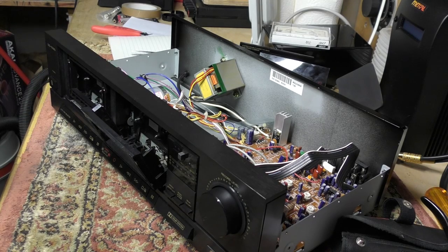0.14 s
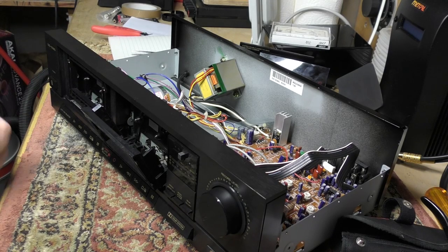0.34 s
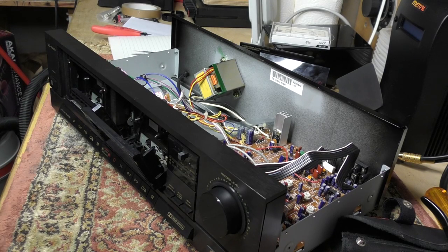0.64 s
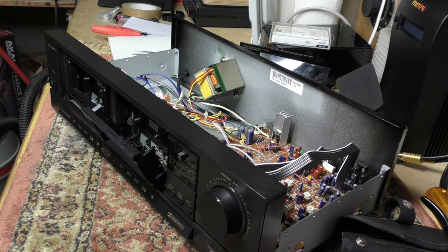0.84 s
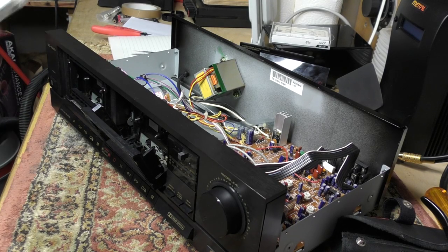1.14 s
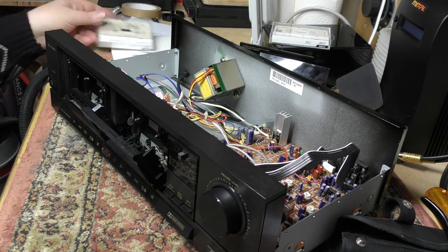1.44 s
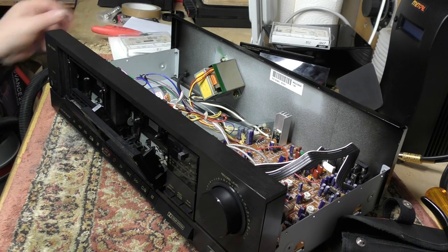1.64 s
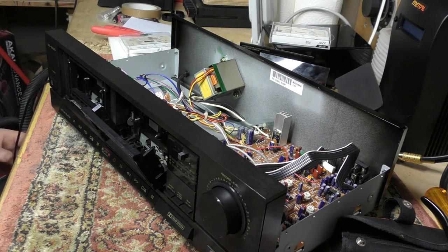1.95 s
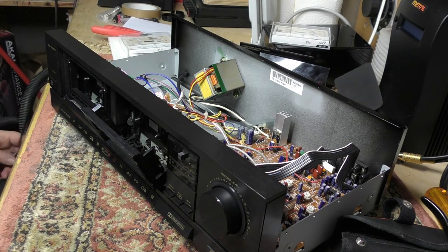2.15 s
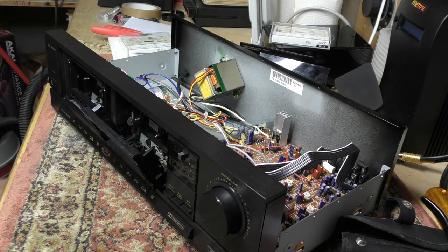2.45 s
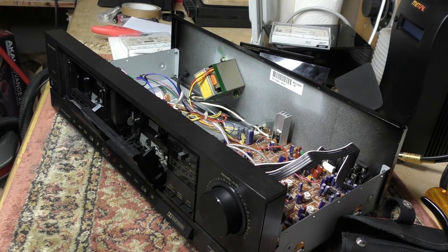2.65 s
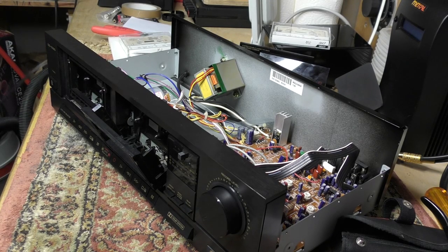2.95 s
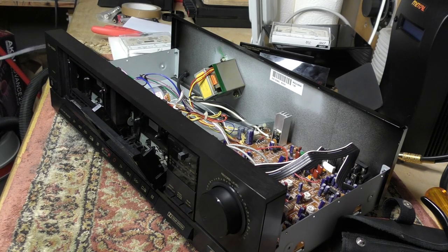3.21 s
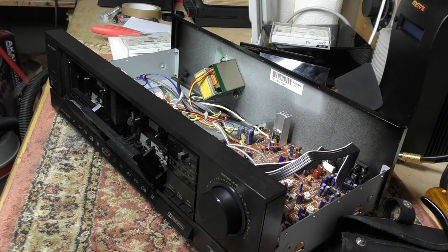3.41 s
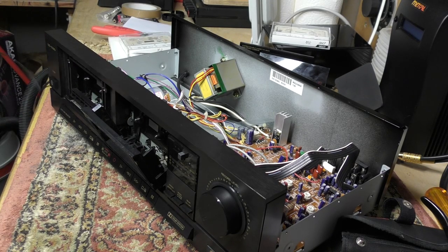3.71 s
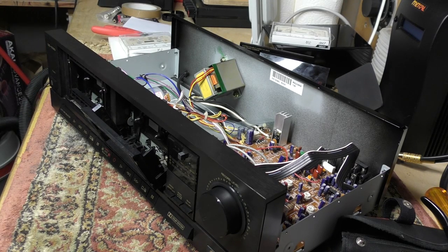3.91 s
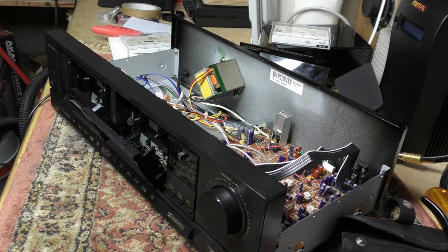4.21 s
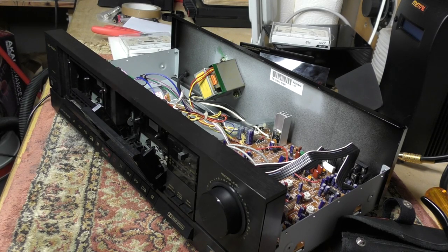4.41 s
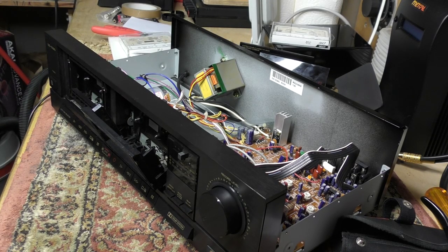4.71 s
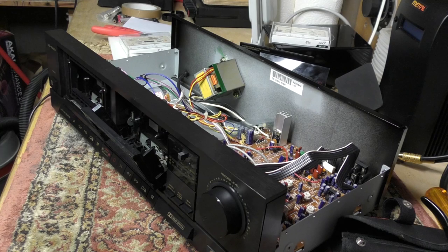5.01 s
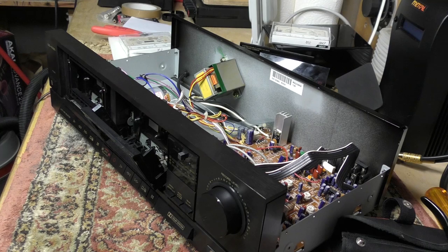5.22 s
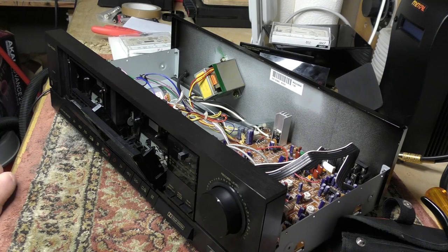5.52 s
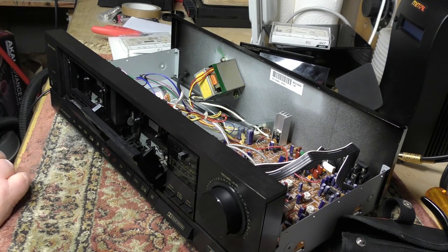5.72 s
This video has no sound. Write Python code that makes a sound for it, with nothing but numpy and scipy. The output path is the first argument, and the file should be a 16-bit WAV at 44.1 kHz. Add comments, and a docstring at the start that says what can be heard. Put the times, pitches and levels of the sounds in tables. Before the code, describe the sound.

Hard plastic clicks and cassette rattles end in a loud clack, then a key mechanism clunks, slides and latches in a small room.

```python
"""Hands at a cassette deck

Hands work hard plastic parts beside an open cassette deck in a small, cluttered room, off-centre to two ports.
Catches snap, a cassette rattles in its case and is put down with a clack; later a key mechanism clunks,
slides and clicks. Contacts are bursts of noise in narrow bands; the room scatters them 3.9 ms behind, and
resonant plastic shells ring to both. Sleeve, pushed air, rumble, hiss and mains hum are shaped noise and a sine."""
import sys
import numpy as np
from scipy import signal
from scipy.fft import rfft, irfft, next_fast_len
from scipy.io import wavfile

SR = 44100
rng = np.random.default_rng(int(sys.argv[2]) if len(sys.argv) > 2 else 0)


def transcribe(u):
    """Save the signal u as a 16-bit wav file named by the first command-line argument.

    u: samples, shape (n,) or (channels, n), limited to [-1, 1]; the rate is SR.
    q: integer samples, one column per channel.
    """
    v = np.clip(np.atleast_2d(u).T, -1, 1)
    q = np.round(v * 32767).astype(np.int16)
    wavfile.write(sys.argv[1], SR, q)


N = 258426
TIME = np.arange(N) / SR

# Steady tone of the room. Each row: frequency in Hz, relative level in dB.
ROOM_TONE = [(11, -54), (18, 6), (59, -7), (201, -16.5), (283, -17), (500, -22), (576, -21.5), (645, -21.5),
             (765, -26), (908, -25), (1110, -26.5), (1950, -30), (3550, -32.5), (16000, -45.5)]
ROOM_TONE_DB = -46
HUM_HZ, HUM_DB = 99.6, -64.5

# Likeness of left and right. Each row: frequency in Hz, correlation from -1 to 1.
FLOOR_LIKENESS = [(30, -.2), (100, 0.13), (400, 0.09), (2000, 0.3), (8000, 0.11)]
CLICK_LIKENESS = [(150, 0.95), (700, 0.43), (2000, 1), (6000, 0.57), (13000, 0.74)]

# Plastic sliding under the fingers. Each row: start in seconds, length in seconds, level in dB before the touch trim.
RUBS = [(0, 0.031, -41), (.28, 0.11, -44), (.58, 0.058, -46.5), (1.2, 0.28, -50.5), (1.55, 0.11, -40.5),
        (4.46, .03, -59)]
RUB_ATTACK_S, RUB_RELEASE_S = 0.059, 0.47
# Spectrum of the rubbing. Each row: frequency in Hz, relative level in dB.
RUB_COLOUR = [(200, -14.5), (500, -11.5), (1400, 1), (2700, -5), (4500, -2), (6500, -8.5), (10000, -14),
              (16000, -30)]

# Hard plastic snapping or striking; small, sharp parts sound bright, heavy ones dark.
# Each row: start in seconds, strength in dB, brightness in dB per octave, ring t60 in seconds at 3 kHz.
CLICKS = [ (.001, 2, -1.4, .06), (.05, -9, -8, 0.014), (0.1183, -9.5, 1.5, 0.046),
          (0.13, -0.5, -4.5, 0.044), (.263, -7, -5, 0.087), (.3093, 4.5, 2, 0.051),
          (0.3157, 9, -0.5, 0.097), (.342, -3.5, -1, 0.023), (0.373, 6.5, -4.5, 0.025),
          (.403, -4, -2, 0.031), (0.5243, -4, -4.5, 0.036), (0.5298, 5.5, 2.3, 0.054), (0.54, 1, -1, .065),
          (.579, -0.5, 0.8, .028), (0.6364, 2, 1, .058), (0.777, -8.5, 0.5, 0.076), (.783, 8, 4.5, 0.026),
          (0.8093, 9, -1, 0.069), (.824, 15, -3, 0.041), (0.946, -10.5, -3, .02),
          (1.0958, 12.5, -4.5, 0.12), (1.103, 13, -4, 0.046), (1.1054, 14, 1.5, 0.028),
          (1.244, 0, 0.5, 0.046), (1.3187, 0.5, -4.5, .055), (1.477, 3, -6, 0.11), (1.501, 20, -0.7, 0.072),
          (1.609, 7.5, -1, 0.039), (1.644, 18, -6, 0.061), (1.652, 5, 4, 0.055), (1.674, 5.5, -1.5, 0.11),
          (5.422, -26.5, 3.5, 0.1)]
# Soft, cushioned bumps of fingers and settling parts, in the same columns as the clicks.
BUMPS = [ (1.103, 15.5, 2, .045), (1.4841, 8, -0.5, 0.044), (1.503, 18.5, 0.5, 0.039),
         (1.852, -13.5, -5.5, 0.092), (1.979, .5, 3, 0.06), (2.197, 0, -3.5, .055), (2.28, -18, -6, 0.038),
         (2.678, -7.5, -2, 0.065), (3.672, 3.5, -2.5, 0.036), (3.72, -1, 2, 0.22), (4.142, -0.5, 0.7, 0.06),
         (4.191, -2.5, 6, 0.22), (4.208, -2.5, -.5, 0.11), (4.463, -3.5, 2.2, 0.15),
         (5.245, -11.5, 1.5, 0.125), (5.315, -10, 0.5, 0.21)]
# The key mechanism clunks in, then latches with a click; same columns again.
KEY_BLOWS = [(3.6568, 14, -5, 0.046), (4.011, -1, 1, 0.048), (4.0134, 7, 1.55, 0.044), (4.017, 2, 0, 0.047),
             (4.054, -5, -4.5, .05)]
# Spectra of the three kinds of contact. Each row: frequency in Hz, level in dB.
CLICK_COLOUR = [(220, -24), (500, -9.5), (1400, 1), (2400, -.5), (4400, -1), (10500, -16.5)]
BUMP_COLOUR = [(110, -10), (250, -1.5), (580, 3.5), (1300, -2), (2600, -7), (4400, -23.5), (10500, -43)]
KEY_COLOUR = [(220, -21), (550, -6.5), (900, -7), (1700, 4), (2600, -1), (3400, 2), (5500, -5.5),
              (10500, -15.5)]
# Timbre common to all contacts. Each row: frequency in Hz, level in dB.
PLASTIC = [(70, -16), (130, 3), (330, -1.5), (600, -1), (950, 2), (1400, 1), (2100, -1.5), (2700, -1),
           (3600, 0), (5500, 5), (7000, 2.5), (9500, 5.5), (12500, -0.5), (16000, -35)]
BRIGHTNESS_PIVOT_HZ = 1500

# The room's answer. Each row: frequency in Hz, level in dB against the direct sound, t60 in seconds.
ROOM = [(150, -7, 0.31), (490, -5, 0.3), (1440, -9, 0.29), (4740, -5.5, 0.23), (9000, -9, 0.22),
        (15000, -13, .14)]

# Modes of the cassette and its case. Each row: frequency in Hz, level in dB before the ring gain, t60 in seconds.
CASE_MODES = [(500, -9, .15), (600, -5, .15), (700, -7, .15), (790, -8, .12), (944, -9, .15),
              (1050, -7, .12), (1200, -6, .09), (1370, -4, .11), (1515, -7, .11), (1765, -7, .1),
              (2190, -7, .11), (2406, -7, .1), (3000, -8, .07), (3262, -4, .11), (3650, -8, .07),
              (3950, -7, .08), (4255, -6, .08), (4950, -6, .09), (5500, -3, .09), (5990, -9, .07)]
# Modes of the key mechanism and its chassis, in the same columns.
KEY_MODES = [(88, 3, .2), (195, -5, .15), (440, -3, .1), (662, -6, .1), (890, -9, .1), (1517, 4, .12),
             (1810, -3, .06), (2100, -5, .07), (3370, 1, .05), (4316, -6, .07), (5280, 0, .07),
             (5920, -5, .08), (8230, -3, .07), (9600, -3, .06)]
KEYS_FROM_S = 3.4

# Where the hands work. Each row: time in seconds, left minus right in dB.
PLACE = [(1.3, 0.5), (1.5, -2), (4, 0), (5.8, -6)]
# Lean between the microphone ports. Each row: frequency in Hz, left minus right in dB.
BALANCE = [(100, -3), (600, -6.5), (1400, -1), (4500, -1.5), (8000, -1), (12000, -5.5)]
# Phase by which the left port leads. Each row: frequency in Hz, lead in radians.
LEFT_LEAD = [(100, .1), (600, 0.32), (1500, 0.76), (3000, 0.85), (5500, 0.66), (8500, 1.33), (11000, 2.63),
             (16000, 4)]

# Air pushed by the passing arm. Each row: start in seconds, length in seconds, level in dB.
GUSTS = [(1.4, 0.045, -32.5), (1.68, 0.098, -35.5), (1.95, 0.35, -43.5)]
GUST_ATTACK_S, GUST_RELEASE_S = 0.064, 0.71
# Spectrum of the pushed air. Each row: frequency in Hz, relative level in dB.
DRAUGHT_COLOUR = [(15, -6), (27, 0), (32, 0), (42, -10), (70, -28), (200, -55), (1000, -90)]

# A sleeve brushes the bench as the arm draws back and reaches in again.
# Each row: start in seconds, length in seconds, level in dB, brightness in dB per octave.
BRUSHES = [(2.5, 0.12, -52.5, -1), (2.823, 0.35, -57, -1), (3.227, 0.093, -55, 8),
           (4.467, 0.27, -52.5, -0.5), (4.772, 0.27, -55.5, -1), (5.1, 0.31, -58.5, -2.5)]
BRUSH_ATTACK_S, BRUSH_RELEASE_S = 0.064, 0.45
# Spectrum of the cloth. Each row: frequency in Hz, relative level in dB.
SLEEVE_COLOUR = [(300, 5), (1200, 5), (3000, 2.5), (5500, 5), (7000, 0), (9000, -1.5), (12000, -9.5),
                 (16000, -15)]

# The mechanism's slider takes up its slack, then runs home.
# Each row: start in seconds, length in seconds, level in dB, first pitch in Hz, last pitch in Hz.
SLIDES = [(3.48, 0.19, -55.5, 4720, 4610), (3.749, 0.31, -50, 4270, 5860)]
SLIDE_ATTACK_S, SLIDE_RELEASE_S = 0.12, 0.7
# Spectrum of the slider's dry friction. Each row: frequency in Hz, relative level in dB.
TRAVEL_COLOUR = [(300, 1), (1100, 2), (2000, -6), (2900, -5.5), (3700, -1), (5700, -2.5), (6800, -14),
                 (10000, -22), (16000, -34)]
# Resonances of the squeak. Each row: multiple of its pitch, level in dB.
SQUEAK = [(.8, -14), (1, -11), (1.12, -13)]

# The clunk of the mechanism shakes the whole deck.
THUMP_AT_S, THUMP_HZ, THUMP_DB, THUMP_T60_S = 3.658, 115, -40, 0.29

CUTOFF_HZ = 16200


def from_db(db):
    """Decibels to gain."""
    return 10 ** (np.asarray(db) / 20)


def unit_energy(x):
    """Scale each row to energy 1."""
    return x / np.sqrt(np.sum(x ** 2, axis=-1, keepdims=True) + 1e-20)


def at_hz(points, hz, axis=1):
    """Read a column of a spectrum table on a log-frequency axis."""
    points = np.array(points)
    return np.interp(np.log(hz), np.log(points[:, 0]), points[:, axis])


def tilted(colour, brightness):
    """A spectrum made brighter by so many dB per octave about the pivot."""
    return [(hz, db + brightness * np.log2(hz / BRIGHTNESS_PIVOT_HZ)) for hz, db in colour]


def fft_grid(length):
    """A fast transform size and its frequencies, kept above zero for the log axis."""
    size = next_fast_len(length)
    return size, np.maximum(np.arange(size // 2 + 1) * SR / size, 1)


def bands():
    """Narrow band-passes: centre, sections, and the gain that white sound keeps in each."""
    edges = np.geomspace(70, 17000, 22)
    for low, high in zip(edges, edges[1:]):
        sos = signal.butter(2, [low, high], "band", fs=SR, output="sos")
        yield np.sqrt(low * high), sos, np.sqrt(2 * (high - low) / SR)


def pair(mid, side, likeness):
    """Left and right from two unrelated signals."""
    alike = np.clip(likeness, -.99, .99)
    mid = np.sqrt((1 + alike) / 2) * mid
    side = np.sqrt((1 - alike) / 2) * side
    return np.array([mid + side, mid - side])


def coloured(white, colour, likeness):
    """Two white signals become a stereo pair with this spectrum; rms 1."""
    size, hz = fft_grid(N)
    spectrum = pair(*rfft(white, size), at_hz(likeness, hz))
    shaped = spectrum * from_db(at_hz(colour, hz))
    return unit_energy(irfft(shaped, size)[:, :N]) * np.sqrt(N)


def noise(colour, likeness):
    """Smooth stereo noise; rms 1."""
    return coloured(rng.standard_normal((2, N)), colour, likeness)


def stroke(start, length, attack_s, release_s):
    """Gain of one movement: it builds up to its start, holds, then falls 60 dB in the release time."""
    rise = np.clip((TIME - start) / attack_s + 1, 0, 1)
    return rise * from_db(-60 * np.maximum(TIME - start - length, 0) / release_s)


def strokes(rows, attack_s, release_s):
    """Summed gain of several movements."""
    return sum(from_db(db) * stroke(start, length, attack_s, release_s) for start, length, db in rows)


def background(lean_db=-0.59):
    """Rumble and hiss as shaped noise, mains hum as a sine, and the soft sounds of a moving arm."""
    steady = from_db(ROOM_TONE_DB) * noise(ROOM_TONE, FLOOR_LIKENESS)
    hum = from_db(HUM_DB) * np.sqrt(2) * np.sin(2 * np.pi * HUM_HZ * TIME)
    arm = draught() + sleeve()
    return (steady + hum + arm) * from_db([[lean_db], [-lean_db]])


def sliding(slips_per_s=1800, smooth=0.98):
    """Rubbed plastic sticks and slips in tiny ticks of uneven size, over smooth noise."""
    sizes = rng.laplace(0, 1, (2, N))
    ticks = sizes * (rng.random((2, N)) < slips_per_s / SR)
    slips = ticks + smooth * rng.standard_normal((2, N))
    return strokes(RUBS, RUB_ATTACK_S, RUB_RELEASE_S) * coloured(slips, RUB_COLOUR, CLICK_LIKENESS)


def contacts(rows, colour, crack, low_linger, patchy_db=1.5):
    """Each contact is a crack plus decaying noise in narrow bands, of which the low ones ring longer."""
    when, strength, brightness, ring = np.transpose(rows)
    colours = [tilted(colour, b) for b in brightness]
    t = TIME[:SR // 8]
    chance = rng.standard_normal((len(when), 4, len(t))).transpose(1, 0, 2)
    # loose parts chatter, so each burst is grainy
    chance = chance * np.abs(chance) ** .4 / 1.2
    hits = 0
    for k, (hz, sos, share) in enumerate(bands()):
        t60 = np.maximum(ring, .004)[:, None] * (hz / 3000) ** -low_linger
        # neighbouring bands take different noise
        burst = chance[2 * (k % 2):][:2] * from_db(-60 * t / t60)
        burst[0, :, 0] += crack * (-1) ** k
        level_db = strength + np.array([at_hz(c, hz) for c in colours]) + at_hz(PLASTIC, hz)
        # no two blows land on the same spot
        level_db = level_db + patchy_db * rng.standard_normal(len(when))
        band = unit_energy(signal.sosfilt(sos, burst))
        hits = hits + pair(*band, at_hz(CLICK_LIKENESS, hz)) * share * from_db(level_db)[:, None]
    out = np.zeros((2, N + len(t)))
    for k, start in enumerate(np.clip(when * SR, 0, N).astype(int)):
        out[:, start:start + len(t)] += hits[:, k]
    return out[:, :N]


def room(x, first_echo_s=0.0039, likeness=0.71):
    """Diffuse reflections from bench and clutter: each band stores the energy it is fed and lets it die away."""
    white = rng.standard_normal((2, 2, N))
    arriving = np.interp(TIME - first_echo_s, TIME, x.mean(axis=0), left=0)
    echoes = 0
    for k, (hz, sos, share) in enumerate(bands()):
        t60 = at_hz(ROOM, hz, axis=2)
        keep = from_db(-120 / (t60 * SR))  # energy, so twice the dB of an amplitude
        fed = signal.sosfilt(sos, arriving) ** 2 + 1e-20
        stored = signal.lfilter([1 - keep], [1, -keep], fed)
        diffuse = pair(*signal.sosfilt(sos, white[k % 2]), likeness) / share
        echoes = echoes + diffuse * np.sqrt(stored) * from_db(at_hz(ROOM, hz))
    return echoes


def shells(blows, modes, ring_db):
    """A body rings after every blow; where it is struck decides which modes speak most."""
    struck = np.sort([row[0] for row in CLICKS + BUMPS + KEY_BLOWS])
    last_contact = np.searchsorted(struck - .002, TIME)
    out = 0
    for hz, level_db, t60 in modes:
        r = from_db(-60 / (min(t60, .2) * SR))
        # a new random excitation of this mode for each contact
        reach = unit_energy(from_db(rng.normal(0, 3, len(struck) + 1))) * np.sqrt(len(struck))
        zeros = np.array([1, 0, -1]) * (1 - r * r) / 2
        poles = [1, -2 * r * np.cos(2 * np.pi * hz / SR), r * r]
        mode = signal.lfilter(zeros, poles, blows * reach[last_contact] + 1e-18)
        out = out + from_db(level_db + ring_db) * mode
    return out


def off_centre(x):
    """The sound reaches the left microphone port a little earlier and mostly weaker, as the hands move."""
    size, hz = fft_grid(N + SR // 10)
    lean = from_db(at_hz(BALANCE, hz) / 2)
    ports = np.array([lean, np.exp(-1j * at_hz(LEFT_LEAD, hz)) / lean])
    # half of the difference goes to each side
    place = np.sqrt(from_db(np.interp(TIME, *np.transpose(PLACE))))
    return irfft(rfft(x * np.array([place, 1 / place]), size) * ports, size)[:, :N]


def draught():
    """Air pushed by the passing arm swells as very low noise at the microphone."""
    return strokes(GUSTS, GUST_ATTACK_S, GUST_RELEASE_S) * noise(DRAUGHT_COLOUR, FLOOR_LIKENESS)


def sleeve():
    """Cloth swishes as broad noise, once for each move of the arm."""
    out = 0
    for start, length, db, brightness in BRUSHES:
        cloth = noise(tilted(SLEEVE_COLOUR, brightness), FLOOR_LIKENESS)
        out = out + from_db(db) * stroke(start, length, BRUSH_ATTACK_S, BRUSH_RELEASE_S) * cloth
    return out


def slider(squeak_width_hz=70.0):
    """Dry friction hisses, with narrow resonances that sink slightly in the slack and rise on the run home."""
    narrow = signal.butter(2, squeak_width_hz, fs=SR, output="sos")
    out = 0
    for start, length, level_db, first_hz, last_hz in SLIDES:
        pitch_hz = np.interp(TIME, [start, start + length], [first_hz, last_hz])
        turn = 2 * np.pi * np.cumsum(pitch_hz) / SR
        friction = from_db(-1.0) * noise(TRAVEL_COLOUR, CLICK_LIKENESS)
        for multiple, squeak_db in SQUEAK:
            # slow noise on a cosine and a sine makes a narrow band around the moving pitch
            a, b = unit_energy(signal.sosfilt(narrow, rng.standard_normal((2, N)))) * np.sqrt(N)
            squeak = a * np.cos(multiple * turn) + b * np.sin(multiple * turn)
            friction = friction + from_db(squeak_db) * squeak
        out = out + friction * from_db(level_db) * stroke(start, length, SLIDE_ATTACK_S, SLIDE_RELEASE_S)
    return out


def deck_thump():
    """The chassis bounces on the bench: a narrow band of bass noise that dies away."""
    around = [(.25, -40), (.5, -8), (1, 0), (2, -18), (4, -50)]  # multiple of the pitch, dB
    colour = [(THUMP_HZ * ratio, db) for ratio, db in around]
    bounce = stroke(THUMP_AT_S, 0, attack_s=.004, release_s=THUMP_T60_S)
    return from_db(THUMP_DB) * bounce * noise(colour, CLICK_LIKENESS)


def scene():
    """Contacts and rubbing spread through the room, coloured by the case or by the key mechanism."""
    clicks = contacts(CLICKS, CLICK_COLOUR, crack=3.4, low_linger=0.11)
    bumps = contacts(BUMPS, BUMP_COLOUR, crack=6.6, low_linger=0.16)
    keys = contacts(KEY_BLOWS, KEY_COLOUR, crack=3.5, low_linger=0.18)
    touch = from_db(-2.0) * (clicks + bumps + keys + sliding())  # the touch trim
    heard = touch + room(touch)
    on_keys = TIME > KEYS_FROM_S
    case_ring = shells(heard * ~on_keys, CASE_MODES, ring_db=7.0)
    key_ring = shells(heard * on_keys, KEY_MODES, ring_db=2.5)
    return off_centre(heard + case_ring + key_ring + slider() + deck_thump()) + background()


def record(dry):
    """The highest peaks are rounded and the top is cut."""
    rounded = np.tanh(dry)
    return signal.sosfilt(signal.ellip(10, .1, 90, CUTOFF_HZ, fs=SR, output="sos"), rounded)


dry = scene()
out = record(dry)
transcribe(out)
```